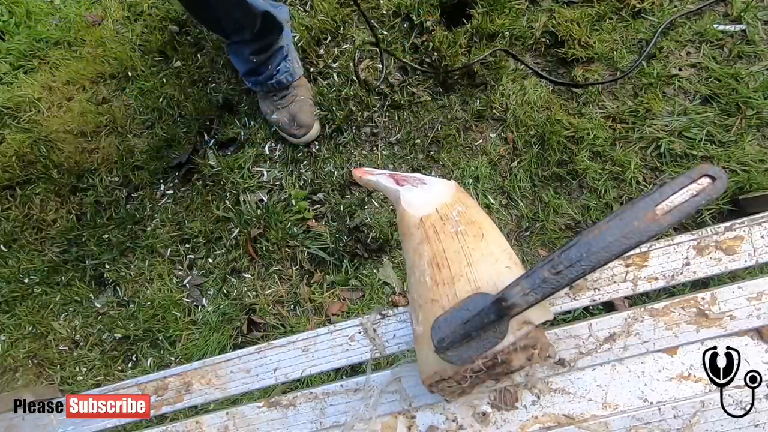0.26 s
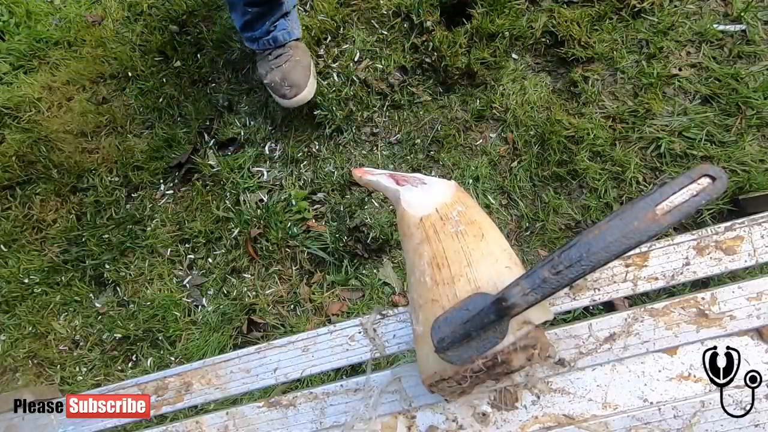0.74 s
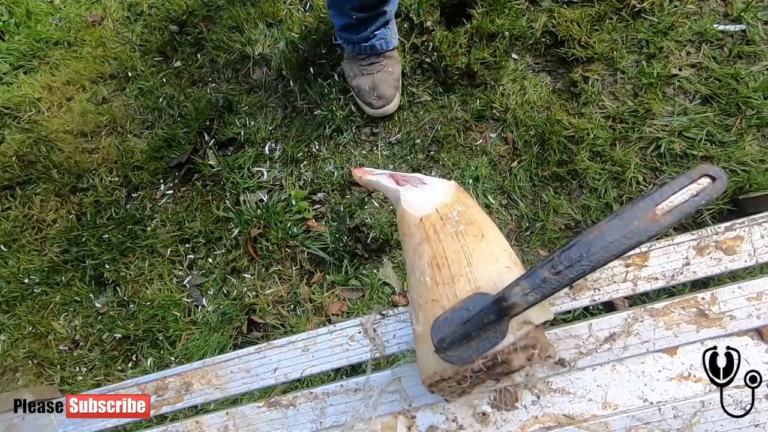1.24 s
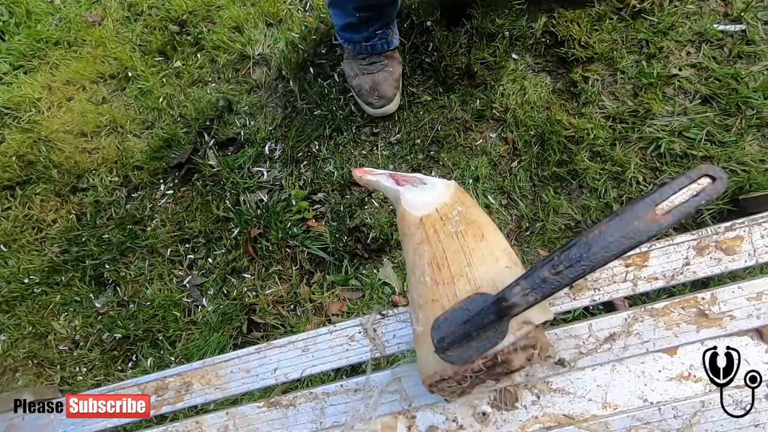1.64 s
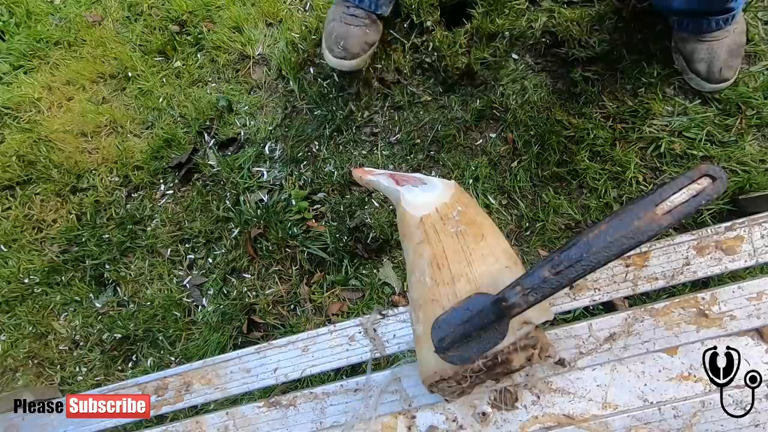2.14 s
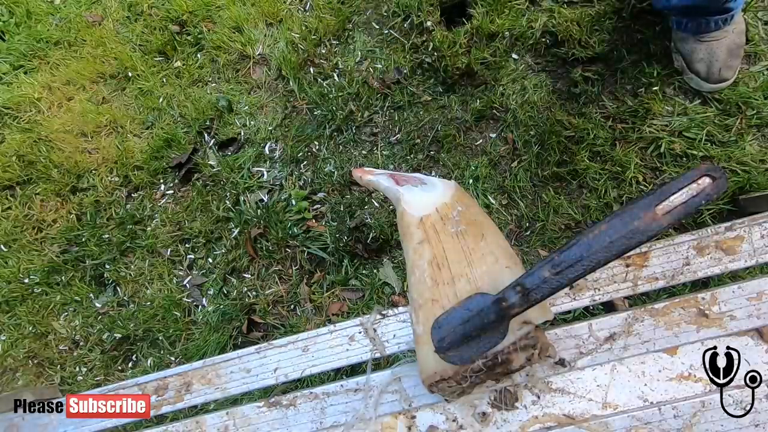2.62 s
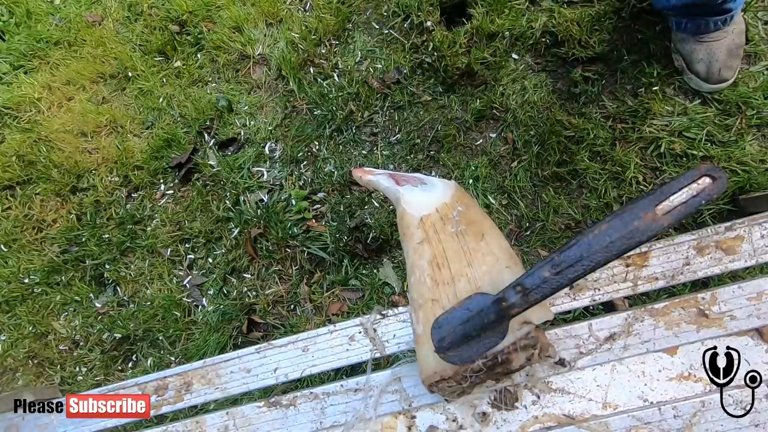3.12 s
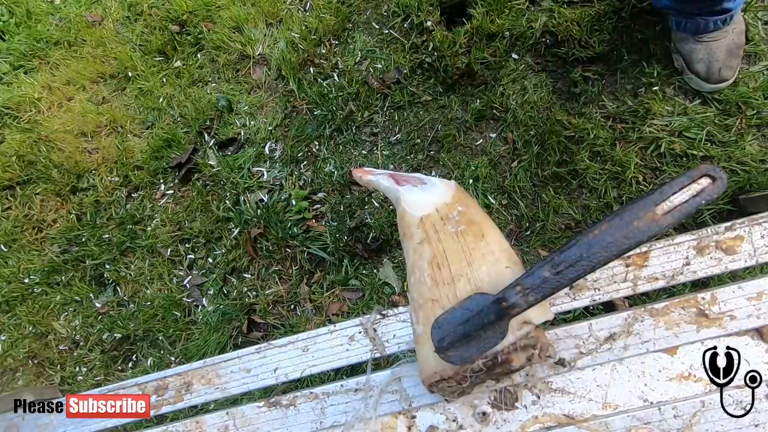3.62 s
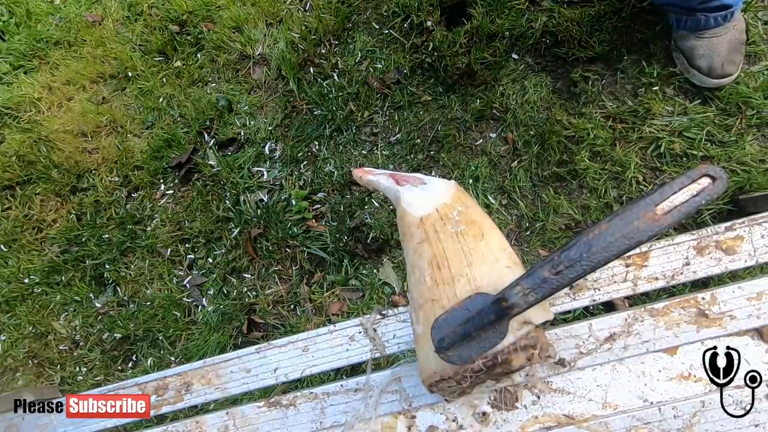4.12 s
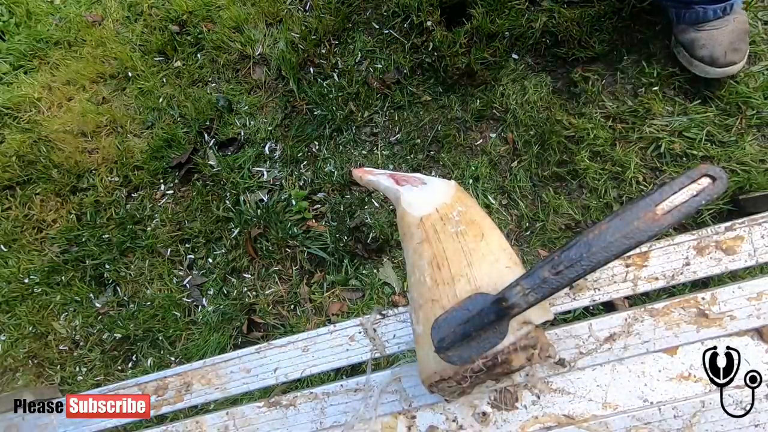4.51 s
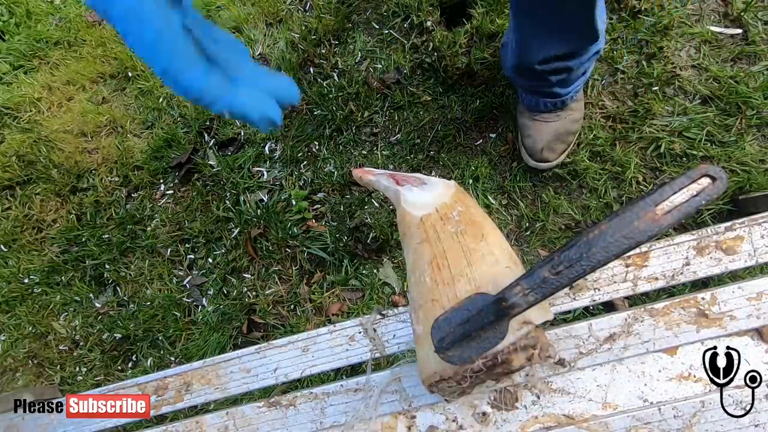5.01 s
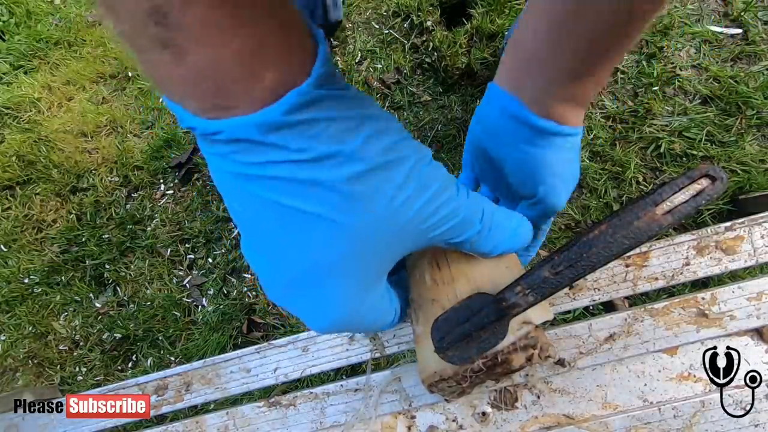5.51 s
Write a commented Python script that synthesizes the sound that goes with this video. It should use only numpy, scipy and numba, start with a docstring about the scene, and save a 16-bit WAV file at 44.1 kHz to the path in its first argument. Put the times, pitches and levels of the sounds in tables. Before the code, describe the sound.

An angle grinder, already switched off, whines down with a dry gear rattle, is set down with a double knock, then cloth and gloves rustle softly.

```python
"""Shaft hum and gear whine slide down as an angle grinder coasts to a stop outdoors, carried past two ports.
Sines locked to the shafts give hum and whine; coloured grains give fan rush; damped modes give the rattle of
the unloaded bevel gears in their play. The tool is set down with a double knock of the same modes.
Filtered noise then rustles as grass, cloth and a glove; low noise and shaken sines thump on the microphone.
Scattering from ground and bench makes the two ports hear the tool differently."""
import sys
import numpy as np
from scipy import signal
from scipy.fft import rfft, irfft, next_fast_len
from scipy.io import wavfile
from scipy.ndimage import uniform_filter1d
from numba import njit

SR = 44100
rng = np.random.default_rng(int(sys.argv[2]) if len(sys.argv) > 2 else 0)


def transcribe(signal):
    """Save signal, clipped to [-1, 1], as a 16-bit WAV file at the path in sys.argv[1]."""
    frames = np.atleast_2d(signal).T
    limited = np.clip(frames, -1, 1)
    pcm = np.round(limited * 32767).astype(np.int16)
    wavfile.write(sys.argv[1], SR, pcm)


def boost_factor(decibels):
    """Convert a level in decibels to a linear amplitude factor."""
    exponent = np.asarray(decibels, float) / 20
    return 10 ** exponent


N = 253575
T = np.arange(N) / SR
M = next_fast_len(N + SR // 4)  # transform length, with silence behind
BIN_HZ = np.arange(M // 2 + 1) * SR / M
OPPOSED = np.array([[1], [-1]])  # left and right in opposite phase


def curves(table):
    """Linear interpolation: every column of a table, sample by sample."""
    s, *columns = np.transpose(table)
    return [np.interp(T, s, c) for c in columns]


def over_hz(points):
    """Interpolation on a logarithmic frequency axis: a (frequency [Hz], value) table on the bins."""
    hz, value = np.transpose(points)
    return np.interp(np.log(BIN_HZ + 1), np.log(hz), value)


def filtered(x, gain):
    """Linear convolution: a gain per bin, with silence behind so that the ends do not meet."""
    return irfft(rfft(x, M) * gain, M)[..., :N]


def colour(x, points):
    """Spectral shaping: filter by (frequency [Hz], gain [dB]) points."""
    return filtered(x, boost_factor(over_hz(points)))


def below(x, hz):
    """Complementary filtering: the part under hz, without phase shift, so that parts add up again."""
    return filtered(x, 1 / (1 + (BIN_HZ / hz) ** 6))


def band(x, lo_hz, hi_hz):
    """Butterworth band-pass filtering."""
    return signal.sosfilt(signal.butter(2, [lo_hz, min(hi_hz, SR / 2.1)], "band", fs=SR, output="sos"), x)


@njit
def moving_band(x, hz, sharp):
    """Tuned resonance: a state-variable band-pass whose centre moves, gain 1 at the centre."""
    y, b, l = np.empty(len(x)), 0., 0.
    for i in range(len(x)):
        g = np.tan(np.pi * hz[i] / SR)
        v = (b + g * (x[i] - l)) / (1 + g * (g + 1 / sharp))
        b, l, y[i] = 2 * v - b, l + 2 * g * v, v / sharp
    return y


def unit(x):
    """Power normalization: scale to rms 1."""
    return x / np.sqrt(np.mean(x ** 2))


def walk(rate):
    """Smoothed random modulation: levels held 1 / rate s and slewed twice."""
    k = int(SR / rate)
    held = np.repeat(rng.standard_normal(N // k + 1), k)
    return uniform_filter1d(uniform_filter1d(held, k), k)[:N]


def swells(events):
    """Exponential growth and decay: each sound rises to a peak and falls at steady rates in dB."""
    total = 0
    for s, db, rise_s, fall_s in events:
        drop_db = 20 * np.where(T < s, (s - T) / rise_s, (T - s) / fall_s)
        total = total + boost_factor(db - drop_db)
    return total


# coasting armature: (time [s], speed [turns/s])
SPEED = [(0, 384), (.36, 337.5), (.72, 294), (1.09, 253), (1.67, 194.5), (2.0, 165), (2.3, 140), (2.5, 125),
         (2.75, 105), (3.05, 83), (3.95, 12)]


def shaft():
    """Rotational kinematics: armature speed [turns/s] and its integral, the angle [rad]."""
    speed = curves(SPEED)[0]
    return speed, 2 * np.pi * np.cumsum(speed) / SR


def slowness(s):
    """Deceleration: the share of the starting speed lost at time s."""
    return 1 - np.interp(s, *np.transpose(SPEED)) / SPEED[0][1]


PINION_TEETH, CROWN_TEETH = 10, 37
HUM_DB, HUM_FADE_DB = -29, 28  # armature hum: level at the start, loss as the speed halves
HUM_DIES_S, HUM_DIES_DB_PER_S = 1.6, 32  # the two strong hums die away as the tool is carried off
# disc hum: (multiple of disc speed, level at the start [dB], loss as the speed halves [dB])
DISC = [(3, -28.5, 23), (6, -42, 17), (9, -50, 15)]


def hum():
    """Rotating imbalance: shaft-locked sines on armature and geared-down disc fade with speed."""
    speed, turns = shaft()

    def fading(db, fade_db):
        waver_db = walk(7) + 2.5 * walk(40)
        loss_db = HUM_DIES_DB_PER_S * np.maximum(T - HUM_DIES_S, 0) * (db > -40)
        return boost_factor(db + fade_db * np.log2(speed / SPEED[0][1]) + waver_db - loss_db)

    total = fading(HUM_DB, HUM_FADE_DB) * np.sin(turns)
    disc_turns = turns * PINION_TEETH / CROWN_TEETH
    for k, db, fade_db in DISC:
        total = total + fading(db, fade_db) * np.sin(k * disc_turns)
    return total


# resonances that whines slide through:
# (multiple of armature speed, frequency [Hz], width [octaves], level before wavering [dB])
WHINE = [(12, 4150, .08, -40), (12, 3650, .13, -32), (12, 3130, .1, -34), (12, 2500, .15, -41),
         (12, 1100, .3, -47), (24, 7000, .4, -51), (24, 4800, .1, -37), (24, 3000, .4, -50),
         (30, 11000, .2, -49), (30, 7900, .2, -42), (30, 6400, .15, -34), (30, 9000, .15, -49),
         (7, 1550, .12, -47), (7, 950, .1, -55), (14, 3350, .07, -37), (14, 2750, .1, -40),
         (35, 8700, .12, -43), (42, 9800, .12, -41), (49, 10200, .1, -44), (10, 930, .1, -51),
         (36, 8000, .3, -44), (48, 6200, .3, -47), (11, 3000, .12, -39)]


def whine():
    """Order resonance: orders of slots, bars, blades, teeth and bearing swell as they cross resonances."""
    speed, turns = shaft()
    total = 0
    for k in sorted({row[0] for row in WHINE}):
        size = 0
        for order, hz, width, db in WHINE:
            if order == k:
                size = size + boost_factor(db) * np.exp(-(np.log2(k * speed / hz) / width) ** 2)
        waver = boost_factor(3 * walk(18) + 3 * walk(45))
        total = total + size * waver * np.sin(k * (turns + .05 * walk(60)))
    return total


# gear case modes: (frequency [Hz], relative level [dB], t60 [s])
CASE = [(489, -9.5, 0.032), (786, -10, 0.031), (950, -6, 0.026), (1514, 5, 0.0067), (1813, 2.5, .02),
        (2054, 1.5, .02), (2425, 2.5, 0.022), (2780, -1.5, 0.03), (3138, 3, 0.025), (3483, 1.5, 0.024),
        (3816, 4.5, 0.013), (4404, 5, 0.013), (4800, 4.5, 0.016), (5300, -1.5, 0.02), (5800, -6, .012),
        (6350, 0, 0.015), (7260, -1, .01), (8630, -8.5, .01), (9600, -2.5, 0.0067)]
OWN_RING_DB, OWN_RING_CYCLES = 10, 48  # ring at each blow's own pitch; its t60 in cycles, .02 s at most
LOW_RING_DB = 8  # a low blow rings this much more faintly at its own pitch
THUD_HZ, THUD_DB = 1100, 10.5  # case modes below this gain up to this much as the speed nears rest


def strikes(events, slap_s, focus_db, focus_oct, grit_db, low_hz, grit_hz):
    """Modal impact: a blow swells, rings at its own pitch and excites the case most near that pitch."""
    out, t = np.zeros(N), np.arange(-int(.008 * SR), int(.03 * SR)) / SR
    swell = np.exp(-(np.minimum(t, 0) / slap_s) ** 2)
    for s, peak_db, ring_hz in events:
        own_db = OWN_RING_DB - focus_db - LOW_RING_DB * (ring_hz < THUD_HZ)  # focus_db is added back below
        own_t60 = min(OWN_RING_CYCLES / ring_hz, .02)
        modes = np.transpose([*CASE, (ring_hz, own_db, own_t60)])
        hz, db, t60 = (column[:, None] for column in modes)
        other = hz != ring_hz
        fade = swell * np.exp(-np.log(1000) * np.maximum(t, 0) / t60)
        near_db = focus_db * np.exp(-(np.log2(hz / ring_hz) / focus_oct) ** 2)
        thud_db = THUD_DB * (hz < THUD_HZ) * other * slowness(s) ** 2
        detune, phase, size = rng.standard_normal((3, len(hz), 1))
        mode_hz = hz * (1 + .016 * detune * other)
        ring = boost_factor(db + near_db + thud_db + 3 * size * other) * fade * np.sin(2 * np.pi * (mode_hz * t + phase))
        grit = boost_factor(grit_db) * rng.standard_normal(len(t)) * np.exp(-(t / slap_s) ** 2)
        grit = band(band(grit, low_hz, grit_hz), low_hz / 2, 1.1 * grit_hz)
        blow = ring.sum(axis=0) + grit
        # level of the loudest 3 ms, as the peak of an equally strong sine
        strength = np.sqrt(uniform_filter1d(band(blow, 400, 8000) ** 2, size=130).max() * 2)
        i = int((s + t[0]) * SR)
        out[max(i, 0):i + len(t)] += boost_factor(peak_db) * blow[max(-i, 0):] / strength
    return out


# gear and fan rush as heard while the tool is moved, before the band levels:
# (time [s], level [dB], left minus right of the whole tool but hum and treble [dB])
RUSH = [(0, -20, -2), (.15, -23.5, -3), (.45, -24, 1.5), (.75, -26.5, 4), (1.4, -28.5, 4), (1.65, -30, 1.5),
        (1.92, -33.5, -6), (2.25, -36, -7.5), (2.61, -33, -5), (2.9, -37, -4.5), (3.2, -37.5, -5),
        (3.95, -46, -4.5)]
# (frequency [Hz], relative density [dB per Hz])
RUSH_COLOUR = [(76, -55), (130, -20.5), (400, -17), (480, -14), (741, -11.5), (1040, -7.5), (2360, -4.5),
               (3070, -3.5), (4900, -6), (5700, -13), (7850, -13), (9780, -13), (11300, -24.5),
               (14300, -23.5), (15500, -54)]
GRAIN_DB, GRAIN_SLOW_DB = 2.8, 1.5  # unevenness of the tooth chatter, and how much more at rest
STOP_S, STOP_DB_PER_S = 3.958, 700  # the rush dies as the gears come to rest


def rush():
    """Turbulence and modal filtering: uneven grains of fan air and tooth chatter, partly rung by the case."""
    uneven_db = GRAIN_DB + GRAIN_SLOW_DB * slowness(T) ** 2
    grains = rng.standard_normal(N) * boost_factor(uneven_db * walk(300) + 0.9 * walk(60))
    rung = 0
    for hz, db, t60 in CASE:
        mode = unit(band(grains, hz - 1.1 / t60, hz + 0.5 / t60))
        rung = rung + boost_factor(db) * mode * boost_factor(3.7 * walk(2.95))
    chatter = unit(colour(grains, RUSH_COLOUR)) + boost_factor(-11.0) * unit(rung)
    stop_db = -STOP_DB_PER_S * np.maximum(T - STOP_S, 0)
    return boost_factor(curves(RUSH)[0] + stop_db) * chatter


# stronger slaps of teeth across their play, before the band levels:
# (time of the peak [s], level over 3 ms [dB], strongest ring [Hz])
CLACKS = [(0.016, -17, 4800), (0.0344, -15, 4580), (0.063, -16, 3610), (0.082, -15, 3400),
          (0.1127, -14, 5050), (0.126, -17, 3310), (0.146, -16, 2770), (0.1826, -15, 3090),
          (0.2105, -15, 3550), (0.2459, -13, 3300), (0.2754, -16, 3140), (0.3073, -16, 3320),
          (0.3402, -15, 3300), (0.3727, -14, 3270), (0.4036, -15, 3270), (0.431, -13, 3260),
          (0.4644, -14, 3210), (0.4989, -14, 3210), (0.5318, -15, 3180), (0.5822, -16, 3700),
          (0.6076, -16, 3260), (0.6435, -14, 2490), (0.678, -14, 2920), (0.7139, -13, 2890),
          (0.7513, -14, 4600), (0.7807, -16, 2940), (0.8082, -18, 2860), (0.8301, -16, 2710),
          (0.858, -15, 2840), (0.893, -17, 2750), (0.9149, -16, 2770), (0.9409, -15, 2760),
          (0.9783, -15, 2720), (1.0107, -16, 2720), (1.0391, -16, 2640), (1.082, -14, 4660),
          (1.118, -16, 4970), (1.1539, -14, 4380), (1.1848, -13, 4370), (1.2207, -16, 4980),
          (1.2611, -14, 4400), (1.2926, -15, 4400), (1.3365, -16, 4510), (1.3759, -16, 3090),
          (1.3978, -17, 4470), (1.4103, -16, 3130), (1.4392, -14, 2030), (1.4771, -17, 4200),
          (1.4961, -18, 3400), (1.528, -15, 3590), (1.551, -15, 3180), (1.5799, -15, 3620),
          (1.6168, -15, 3020), (1.6368, -17, 3040), (1.6732, -14, 3670), (1.6996, -18, 3090),
          (1.7166, -14, 3100), (1.7505, -16, 3760), (1.7755, -15, 3220), (1.8104, -17, 3470),
          (1.8323, -19, 1850), (1.8707, -16, 3520), (1.8997, -17, 3330), (1.9276, -18, 3370),
          (1.9396, -17, 3200), (1.9635, -18, 2970), (1.9885, -18, 3380), (2.0169, -19, 3270),
          (2.0309, -20, 2950), (2.0578, -21, 4680), (2.0733, -21, 3130), (2.1067, -21, 1610),
          (2.1267, -23, 4420), (2.1456, -21, 3080), (2.184, -21, 3010), (2.198, -19, 4410),
          (2.2249, -18, 1630), (2.2594, -23, 2980), (2.2798, -23, 3050), (2.3003, -20, 3330),
          (2.3277, -22, 3300), (2.3546, -22, 3110), (2.3756, -22, 2970), (2.4095, -21, 3670),
          (2.4345, -23, 2430), (2.4619, -24, 2420), (2.4829, -21, 2440), (2.5153, -20, 2400),
          (2.5417, -23, 1750), (2.5737, -21, 1730), (2.5901, -23, 2970), (2.6086, -20, 3010),
          (2.6455, -21, 1800), (2.6704, -22, 1820), (2.6884, -23, 3140), (2.7068, -21, 2150),
          (2.7213, -24, 1800), (2.7433, -22, 1830), (2.7817, -24, 1990), (2.795, -28, 1760),
          (2.818, -27, 2080), (2.846, -25, 1900), (2.874, -23, 2390), (2.8959, -23, 1850),
          (2.916, -27, 1870), (2.9353, -26, 1840), (2.961, -27, 1880), (2.9737, -25, 1800),
          (2.9952, -23, 4580), (3.0156, -26, 1910), (3.04, -28, 1490), (3.065, -24, 810),
          (3.093, -29, 1560), (3.109, -27, 1490), (3.1324, -26, 4000), (3.1483, -28, 1810),
          (3.1698, -27, 3580), (3.197, -29, 1460), (3.2127, -25, 1450), (3.228, -29, 4650),
          (3.253, -29, 1740), (3.2676, -28, 1850), (3.298, -29, 1480), (3.316, -29, 770),
          (3.336, -28, 3120), (3.348, -28, 3100), (3.38, -29, 500), (3.398, -29, 520), (3.431, -30, 3100),
          (3.448, -32, 3870), (3.471, -30, 770), (3.488, -32, 2320), (3.511, -32, 490), (3.528, -33, 450),
          (3.543, -32, 2860), (3.569, -32, 920), (3.589, -32, 3040), (3.616, -31, 3110), (3.635, -33, 3120),
          (3.649, -33, 3500), (3.681, -34, 1570), (3.692, -33, 3350), (3.7096, -30, 3430),
          (3.758, -32, 3130), (3.776, -33, 3020), (3.7929, -31, 3100), (3.816, -34, 950),
          (3.831, -34, 3460), (3.862, -36, 1490), (3.884, -35, 3410), (3.904, -36, 2930), (3.928, -36, 920)]
LIGHT_GAP_S = .021  # mean spacing of the light slaps
LIGHT_DB, LIGHT_SLOW_DB, LIGHT_SCATTER_DB = -3, 10, 1.8  # level over the rush, gain at rest, scatter


def light_clacks():
    """Backlash impacts: weaker, unevenly spaced slaps where no strong one falls, each favouring a case ring."""
    when, size, which = rng.standard_normal((int(STOP_S * 50), 3)).T
    s = LIGHT_GAP_S * (np.arange(len(when)) + .25 * when)
    db = np.interp(s, *np.transpose(RUSH)[:2]) + LIGHT_DB + LIGHT_SCATTER_DB * size
    db = db + LIGHT_SLOW_DB * slowness(s)
    rings = np.array([hz for hz, _, _ in CASE if 1400 < hz < 5000])
    ring_hz = rings[(1000 * np.abs(which)).astype(int) % len(rings)]
    free = np.abs(s[:, None] - np.transpose(CLACKS)[0]).min(axis=1) > .011
    return np.transpose([s, db, ring_hz])[free & (s < STOP_S)]


def clacks():
    """Backlash impacts: strong and light tooth slaps rattle the unloaded gears."""
    return strikes([*CLACKS, *light_clacks()], slap_s=0.003, focus_db=7.0, focus_oct=0.3,
                   grit_db=8.5, low_hz=1900, grit_hz=9000)


# a smeared ring at the gear mesh rate: (time [s], boost at its centre [dB])
HOLLOW = [(0, 0), (.2, 5), (.8, 7), (1.3, 4), (1.65, 10), (2.1, 9), (2.5, 5), (3.95, 2)]
# gains: (time [s], bass [dB], low middle [dB], treble [dB]), against the middle
BANDS = [(0, 2, -2, -21), (.5, .5, -8, -10.5), (1.0, -2.5, -9.5, 2), (1.55, -2.5, -14, 7),
         (1.9, -9, -11, 6.5), (2.25, -7, -3, 1.5), (2.61, -7, -3, -4), (3.0, 1, -1, -4), (3.95, 4, -2, -10)]
MESH_LOWEST_HZ = 1600  # the ring stops sinking here
DEEP_HZ, DEEP_DB = 350, -5  # the deepest rush and slaps keep a steady gain
TOP_HZ, TOP_LEAST_DB, TOP_MOST_DB = 10500, -6, 3  # the highest hiss changes less than the treble


def grinder():
    """Source directivity: bass, low middle and treble come and go as the tool is turned and carried."""
    pan_db = curves(RUSH)[1]
    bass_db, low_middle_db, treble_db = curves(BANDS)
    shaft_hum, gear_whine = hum(), whine()
    body = rush() + clacks()
    mesh_hz = np.maximum(PINION_TEETH * curves(SPEED)[0], MESH_LOWEST_HZ)
    body = body + (boost_factor(curves(HOLLOW)[0]) - 1) * moving_band(body, mesh_hz, 19.6)
    to_deep, to_bass, to_low_middle = below(body, DEEP_HZ), below(body, 1100), below(body, 2300)
    to_middle, to_treble = below(body, 6100), below(body, TOP_HZ)
    panned = boost_factor(DEEP_DB) * to_deep + boost_factor(bass_db) * (to_bass - to_deep)
    panned = panned + boost_factor(low_middle_db) * (to_low_middle - to_bass) + to_middle - to_low_middle + gear_whine
    treble = boost_factor(treble_db) * (to_treble - to_middle)
    top = boost_factor(np.clip(treble_db, TOP_LEAST_DB, TOP_MOST_DB)) * (body - to_treble)
    return shaft_hum + boost_factor(OPPOSED * pan_db / 2) * panned + treble + top


# scattered sound that differs between the ports: (frequency [Hz], gain [dB])
SCATTER = [(60, -11.5), (110, -8), (200, -22), (380, -30.5), (700, -20.5), (1290, -10.5), (2380, -13.5),
           (4400, -16), (8120, -3.5), (15000, -4)]
# (frequency [Hz], left minus right [dB])
PORT_TREBLE = [(100, 0), (1200, 0), (3000, -2.8), (8000, 3), (15000, 7)]
# response shared by both ports: (frequency [Hz], gain [dB])
LOW_CUT = [(10, -61), (100, -33), (140, -2.5), (200, 2.5), (10300, -2), (11300, -7), (20000, -4.5)]


def spread(x, tail_s, turn_hz):
    """Scattering: ground and bench feed the ports unequally; the pattern turns over as the tool moves."""
    t = np.arange(int(6 * tail_s * SR)) / SR
    tails = rng.standard_normal((2, len(t))) * np.exp(-t / tail_s)
    tails /= np.sqrt(np.sum(tails ** 2, axis=1, keepdims=True))
    scatter = filtered(x.mean(axis=0), rfft(tails, M) * boost_factor(over_hz(SCATTER)))
    angle = 2 * np.pi * turn_hz * T
    side = scatter[0] * np.cos(angle) + scatter[1] * np.sin(angle)
    port_gain = boost_factor(over_hz(PORT_TREBLE) * OPPOSED / 2 + over_hz(LOW_CUT))
    return filtered(x + side * OPPOSED, port_gain)


# low thumps on both ports alike: (time of the peak [s], level [dB], 20 dB rise [s], 20 dB fall [s])
THUMPS = [(0, -66, .1, .7), (1.12, -60, .15, .15), (1.55, -47, .04, .1), (4.05, -66, .06, .2),
          (4.94, -42, .03, .1), (5.0, -39, .05, .14), (5.6, -67, .5, .5), (5.725, -40, .02, .3)]
# (frequency [Hz], relative density [dB per Hz])
BUMP_COLOUR = [(10, -8), (25, -1), (70, -1), (150, -6), (300, -17), (600, -45), (20000, -99)]
RUMBLE_DB = -82  # steady floor of low rumble


def bumps():
    """In-phase excitation: low noise reaches both ports alike."""
    return (boost_factor(RUMBLE_DB) + swells(THUMPS)) * unit(colour(rng.standard_normal(N), BUMP_COLOUR))


# pushing the ports apart: (time of the peak [s], relative level [dB], 20 dB rise [s], 20 dB fall [s])
SHAKES = [(5.1, -68, .1, .5), (5.34, -35, .06, .2), (5.55, -56, .1, .3), (5.74, -23, .045, .2)]
# microphone mount shaking: (frequency [Hz], relative level [dB])
MOUNT = [(53, -2.5), (104, -3)]
# (frequency [Hz], relative density [dB per Hz])
PUSH_COLOUR = [(10, -14.5), (30, 2), (110, 2), (135, -14), (300, -22), (600, -30), (1150, -20), (1800, -38),
               (20000, -99)]


def shakes():
    """Antiphase excitation: mount sines and air noise push one port against the other, louder right."""
    shake = boost_factor(-7.0) * unit(colour(rng.standard_normal(N), PUSH_COLOUR))
    for hz, db in MOUNT:
        shake = shake + boost_factor(db) * np.sin(2 * np.pi * hz * T + 1.95 * walk(23))
    return swells(SHAKES) * shake * np.array([[-boost_factor(-6.0)], [boost_factor(5.0)]])


# tool set down, before the port gains: (time of the peak [s], level over 3 ms [dB], strongest ring [Hz])
KNOCKS = [(3.961, -25, 3340), (3.964, -28, 4800), (3.9705, -22, 2900), (3.972, -26, 820),
          (3.978, -25, 3660), (3.987, -32, 3060), (4.007, -30, 9900), (4.0075, -30, 3000),
          (4.0145, -28, 3000), (4.0155, -27, 800), (4.017, -29, 1530), (4.029, -37, 900)]


def knocks():
    """Impact excitation: setting the tool down strikes the case modes, louder on the right."""
    blows = strikes(KNOCKS, slap_s=0.0013, focus_db=7.0, focus_oct=0.71, grit_db=14.0, low_hz=300, grit_hz=8500)
    return blows * boost_factor(-2.0 * OPPOSED)


def friction_noise():
    """Partial coherence: uneven noise, half alike on the two ports."""
    mid, side = rng.standard_normal((2, N)) * boost_factor(1.2 * walk(300))
    return mid + 0.67 * side * OPPOSED


# grass and cloth: (time of the peak [s], level [dB], 20 dB rise [s], 20 dB fall [s])
RUSTLE = [(4.0, -42, .03, .13), (4.08, -62, .1, .3), (4.47, -62, .3, .15), (4.97, -56.5, .4, .7),
          (5.25, -56, .4, .9), (5.74, -52, .04, .2)]
# (frequency [Hz], relative density [dB per Hz])
RUSTLE_COLOUR = [(76, -31), (130, -10.5), (169, -4), (480, -13), (756, -11.5), (2560, -13.5), (3390, -13.5),
                 (5260, -15), (9780, -24), (15500, -49)]
QUIET_DB = -71  # steady floor of rustle


def rustle(wide):
    """Friction noise: soft crackle of grass and cloth swells over a steady floor."""
    return (boost_factor(QUIET_DB) + swells(RUSTLE)) * unit(colour(wide, RUSTLE_COLOUR))


# brighter brushing and small ticks of cloth:
# (time of the peak [s], level [dB], 20 dB rise [s], 20 dB fall [s])
SWISH = [(4.22, -68, .05, .05), (4.44, -61, .25, .25), (4.52, -63, .15, .08), (4.612, -60, .004, .01),
         (4.7, -67, .1, .12), (5.003, -56, .004, .015), (5.26, -55, .006, .02), (5.52, -62, .005, .015)]
# (frequency [Hz], relative density [dB per Hz])
SWISH_COLOUR = [(300, -30), (1200, -6), (3000, 0), (6000, -3), (10000, -11), (12000, -18), (15500, -24),
                (20000, -40)]


def swish(wide):
    """Friction noise: brighter brushing and ticks, with the two ports exchanged."""
    return swells(SWISH) * unit(colour(wide[::-1], SWISH_COLOUR))


# rubber glove: (time of the peak [s], level [dB], 20 dB rise [s], 20 dB fall [s])
CREAKS = [(4.95, -64, .3, .5), (5.1, -60, .4, .5), (5.3, -61, .5, .6)]
# bands of the creak: (frequency [Hz], width [Hz], relative level [dB])
GLOVE = [(3700, 6000, -8), (2170, 500, 0), (4200, 400, -6), (5150, 500, -2), (6100, 600, -7)]


def glove(wide):
    """Formant filtering: a rubber glove creaks in bands of noise that waver separately."""
    creak = 0
    for hz, width, db in GLOVE:
        creak = creak + boost_factor(db + 3.5 * walk(9)) * band(wide, hz - width / 2, hz + width / 2)
    return swells(CREAKS) * unit(creak)


def scene():
    """Superposition: grinder and knocks with their scatter, over rustle and thumps."""
    tool = spread(knocks() + grinder(), tail_s=0.017, turn_hz=1.53)
    wide = friction_noise()
    return tool + rustle(wide) + swish(wide) + glove(wide) + bumps() + shakes()


def top_cut(x):
    """Nothing passes above the cut-off."""
    return signal.sosfilt(signal.butter(12, 15690, fs=SR, output="sos"), x)


def record(dry):
    """Signal chain: the finished mix passes through one last stage."""
    return top_cut(dry)


dry = scene()
out = record(dry)
transcribe(out)
```